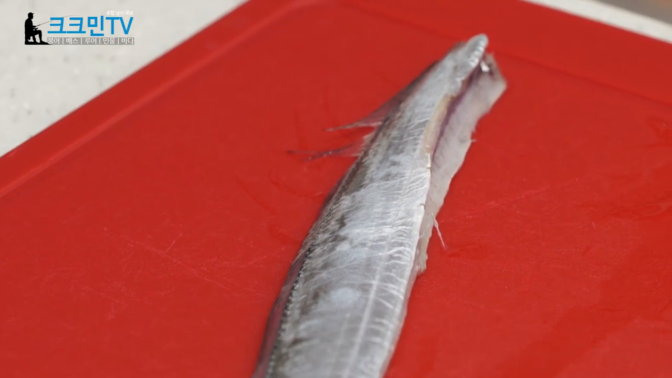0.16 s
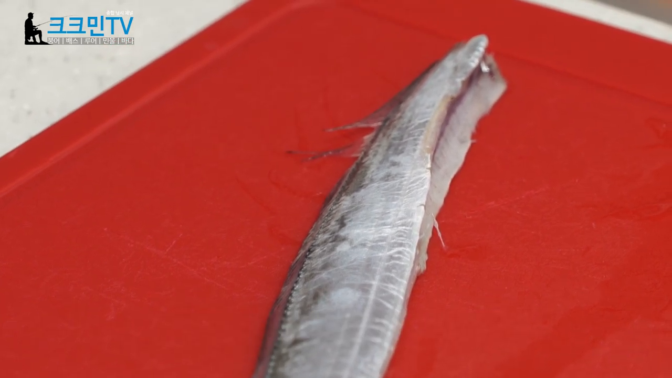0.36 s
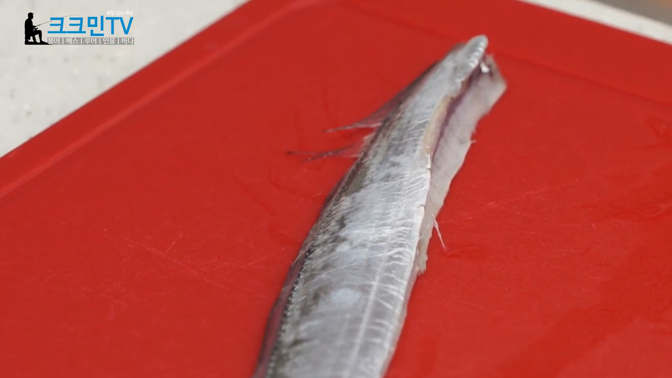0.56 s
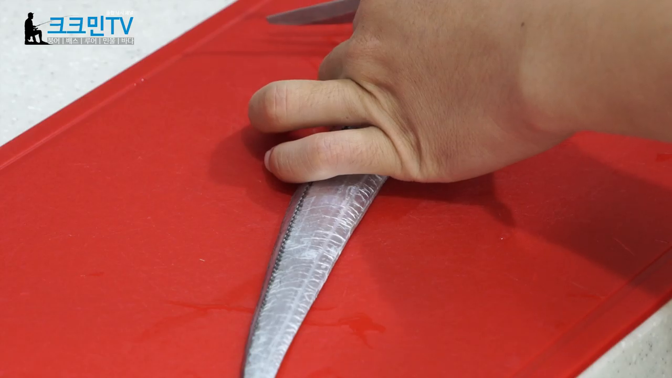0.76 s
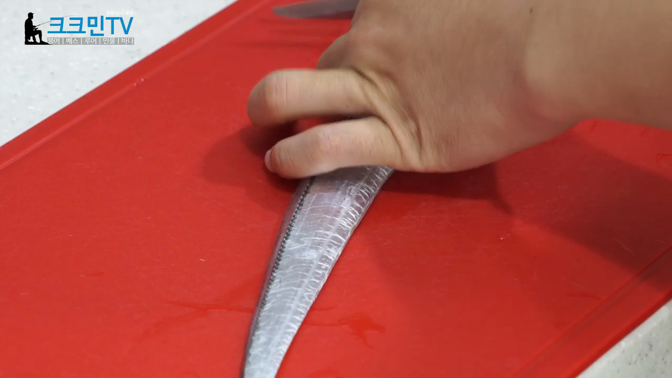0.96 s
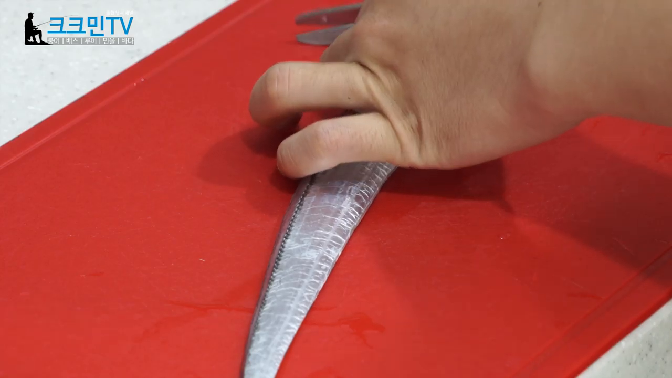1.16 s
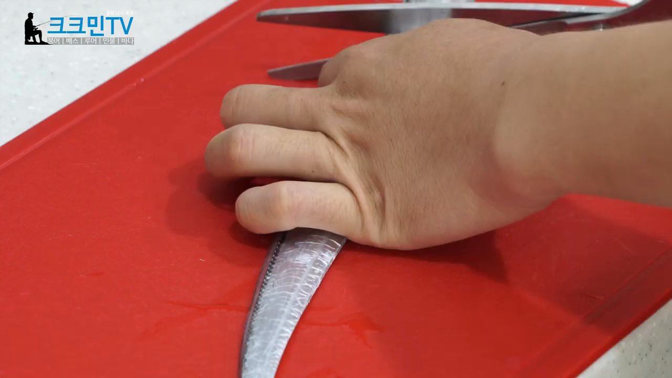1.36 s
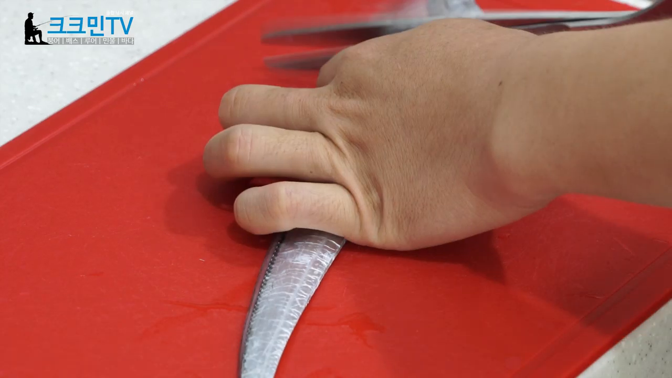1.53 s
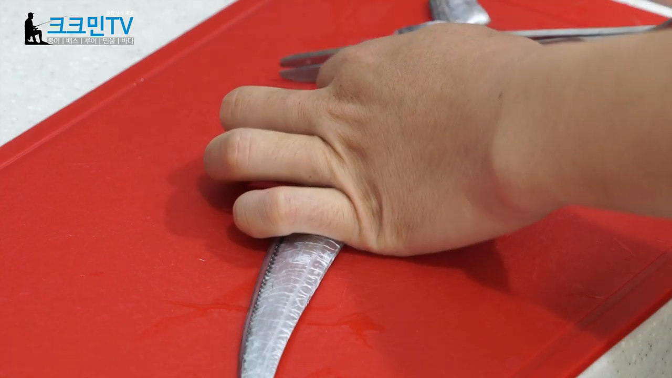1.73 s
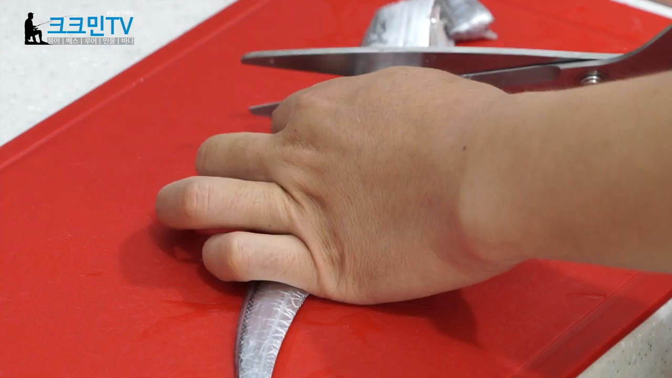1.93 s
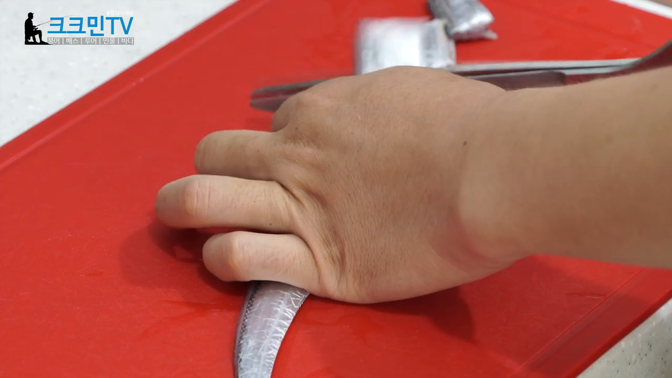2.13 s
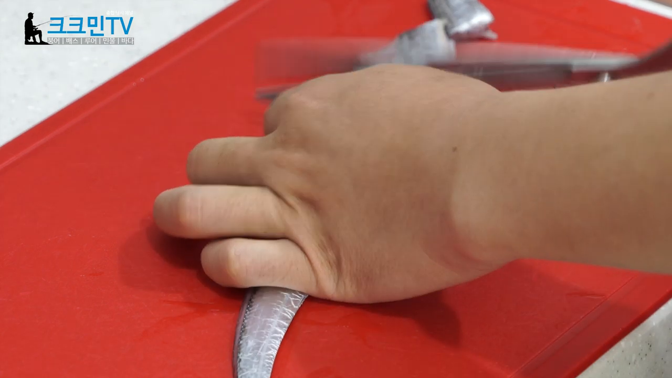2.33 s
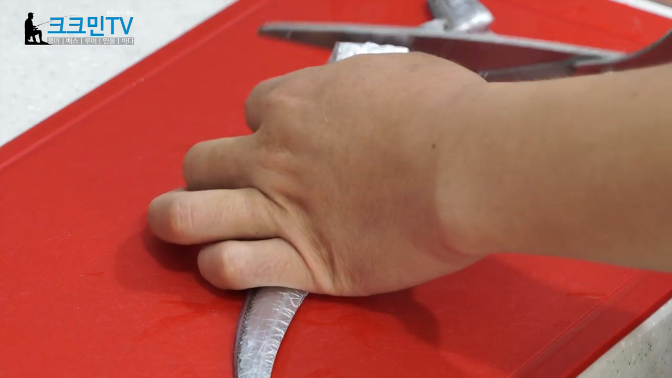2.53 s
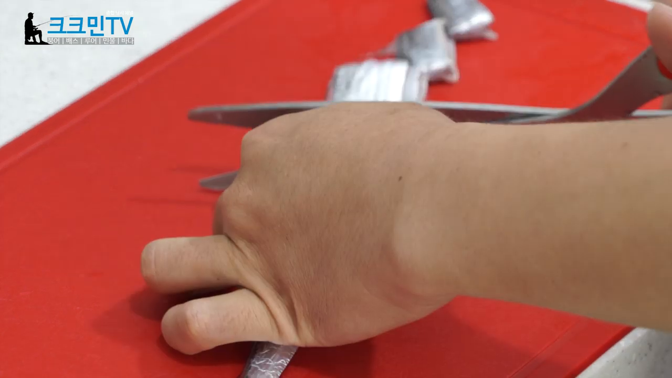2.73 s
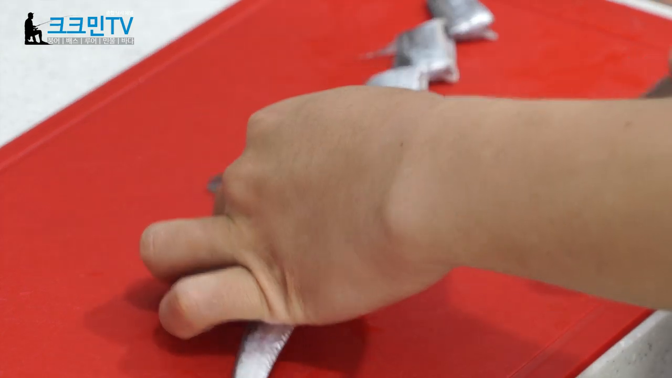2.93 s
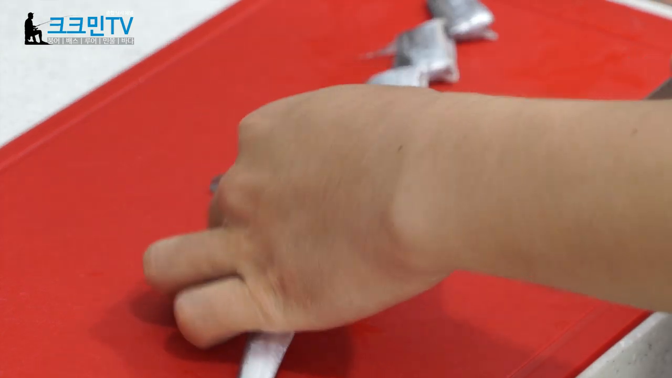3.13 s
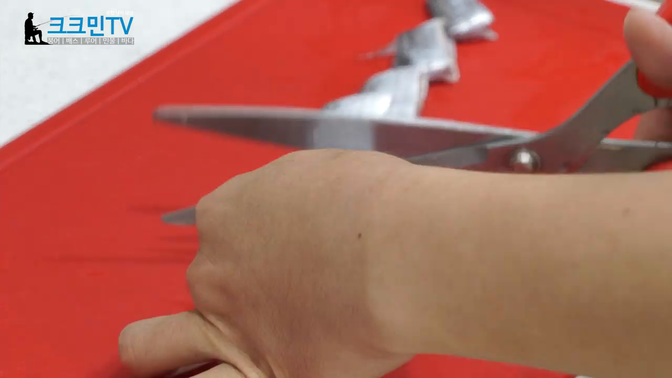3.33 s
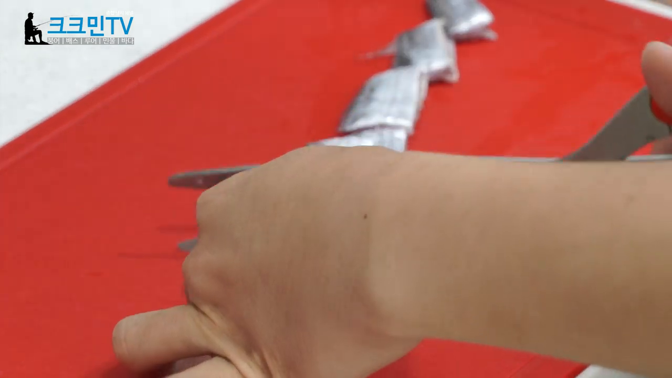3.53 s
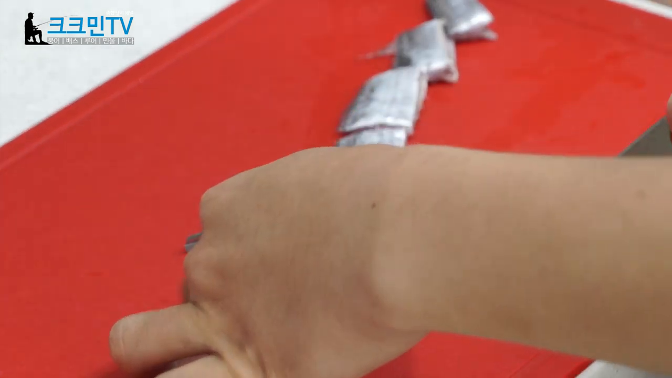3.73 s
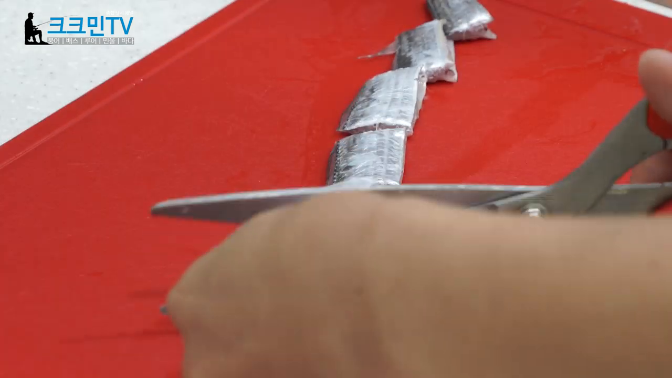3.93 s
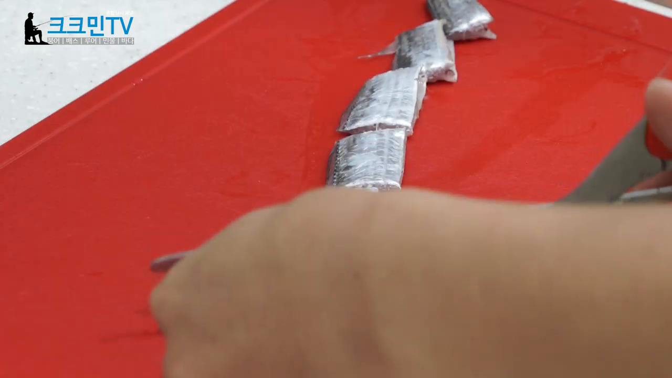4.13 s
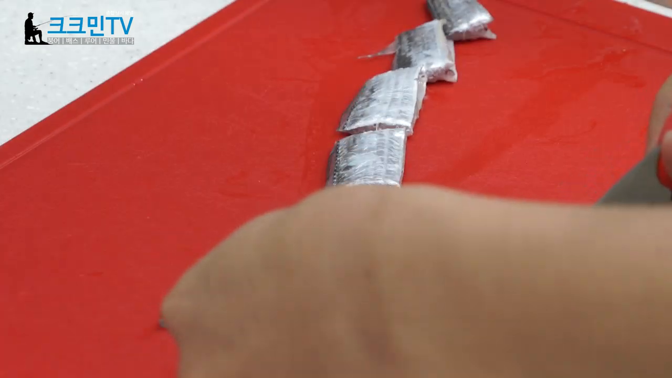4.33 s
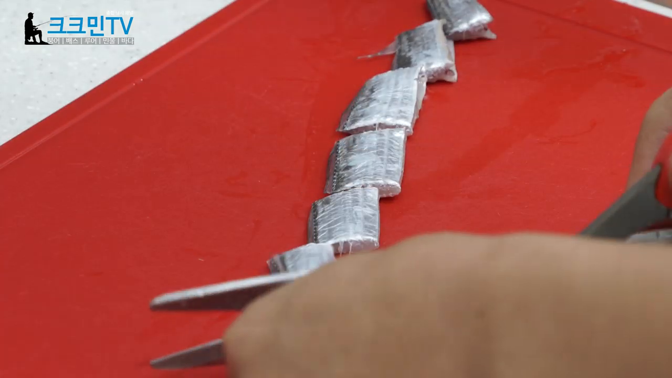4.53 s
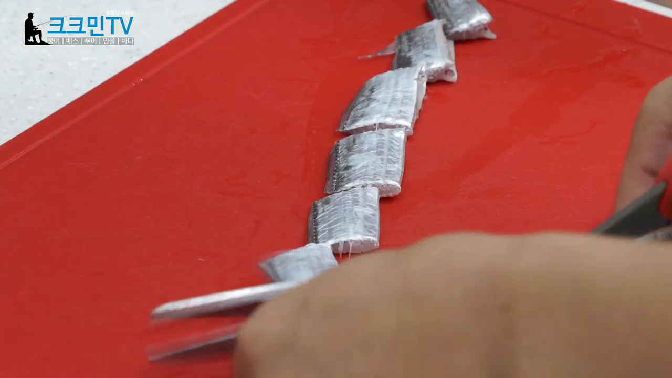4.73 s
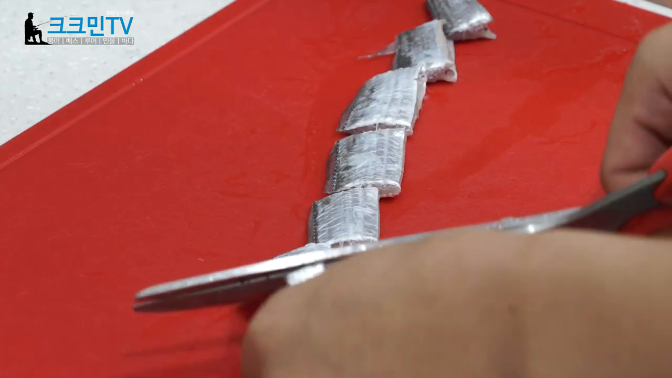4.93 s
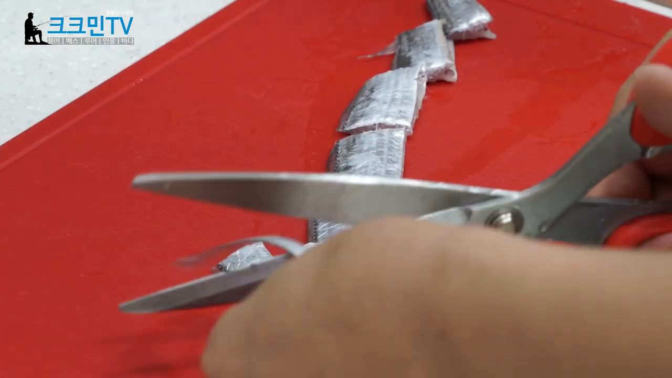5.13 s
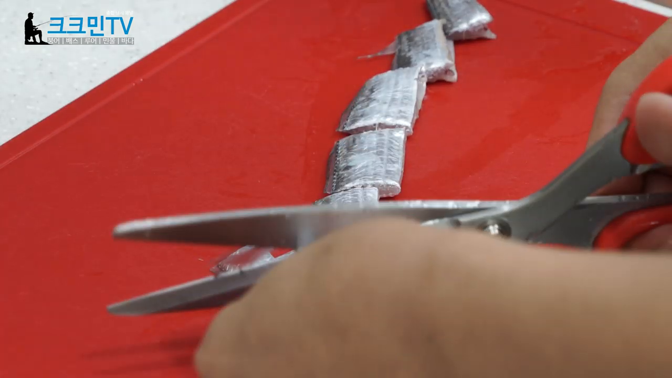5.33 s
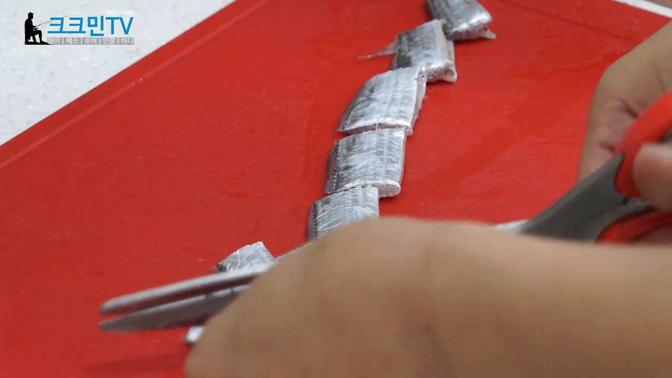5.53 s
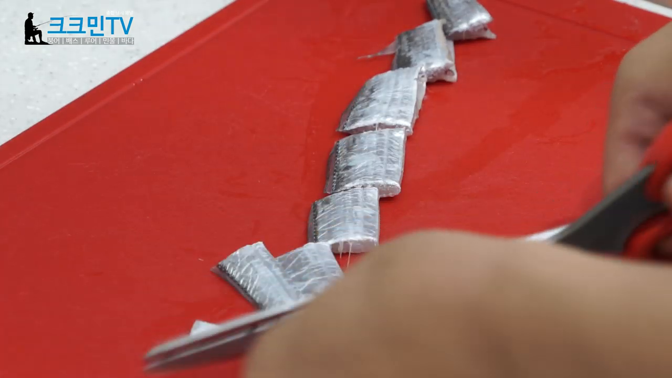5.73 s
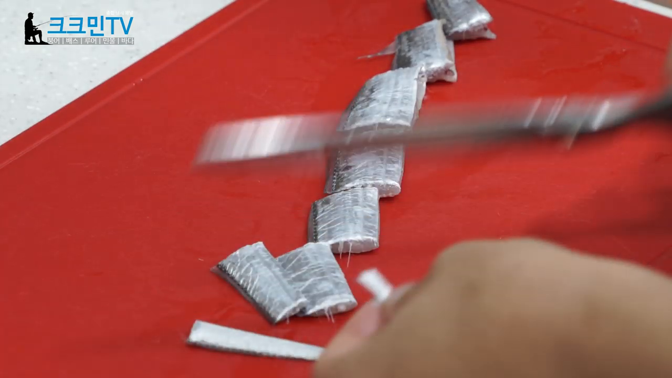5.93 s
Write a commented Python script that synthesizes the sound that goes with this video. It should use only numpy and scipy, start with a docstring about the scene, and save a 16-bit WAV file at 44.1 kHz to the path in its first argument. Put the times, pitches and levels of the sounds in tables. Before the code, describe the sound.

Kitchen scissors scrape and crunch through a small fish on a plastic board, handles clacking and board thudding, close up in a lightly echoing kitchen.

```python
"""Kitchen scissors cut a small fish on a plastic board, heard close by in mono.
The blades scrape and tick with a thin, mostly rising squeal: noise and clicks ringing steel resonances.
Clumped bursts of tiny fractures crunch through bone and skin; the handles clack shut as struck plastic.
Knocks on the board are filtered blows with a slow boom, and decaying sines ring the counter.
Around them, noise tails give the kitchen's reverberation, and a fan adds shaped noise and hum lines."""
import sys
import numpy as np
from scipy import signal
from scipy.fft import rfft, irfft, next_fast_len
from scipy.io import wavfile
from scipy.ndimage import uniform_filter1d

SR = 44100
rng = np.random.default_rng(int(sys.argv[2]) if len(sys.argv) > 2 else 0)


def generate_wav(sig):
    """Save sig (samples, or channels by samples) to the path in sys.argv[1] as 16-bit PCM at SR."""
    pcm = np.round(np.clip(np.atleast_2d(sig).T, -1, 1) * 32767).astype(np.int16)
    wavfile.write(sys.argv[1], SR, pcm)


N = 267687
TIME = np.arange(N) / SR

# The blades shear through bone and skin: start_s, length_s, level_db, blade_ring_hz, tilt_db_per_octave
BONE_CUTS = [(0.9566, 0.011, -19.5, 6250, 3.5), (.991, 0.0052, -18.5, 9000, 3),
             (1.271, 0.0055, -35, 5840, -1), (1.542, 0.01, -23, 8100, 4),
             (1.5605, 0.0062, -15.5, 8800, 1.5), (1.812, 0.017, -33.5, 8900, -1),
             (2.1396, .002, -17.5, 9900, 3), (2.153, 0.0069, -9.5, 10000, 1.5),
             (2.34, 0.032, -29, 11400, -1), (2.874, 0.019, -18, 7700, 1.5), (2.8829, .0033, -14, 8460, 0.5),
             (3.634, 0.0053, -10.5, 7740, 1.3), (4.1908, 0.017, -14.5, 8740, 1.5),
             (4.5, .015, -29, 9700, 1.5), (4.787, 0.0073, -16, 9500, 1.8), (5.111, 0.032, -36.5, 9600, -1),
             (5.391, 0.0097, -33, 6560, 2.5), (5.481, 0.012, -24.5, 7840, -1),
             (5.529, 0.0093, -32, 8500, -3.5)]
# Colour of the crunch: pitch_hz, level_db
CRUNCH_COLOUR = [(150, -30), (500, -3.5), (780, 10.5), (1100, 2), (1550, -2), (2200, 1.5), (3200, -0.5),
                 (4200, 4), (5400, -1.5), (7200, 1), (10000, 2.5), (12000, -1), (14300, -2.5), (16000, -6)]
CLUMP_DB = 3.2  # rms unevenness of the fractures
CUT_RING_DB = -12  # blade ring against the crunch

# Loudest catches of the edges and snaps of small bones: start_s, level_db, tilt_db_per_octave
EDGE_TICKS = [(.721, -27.5, 2.5), (.752, -19.5, -0.5), (.789, -17, -1), (.823, -17.5, -2),
              (0.9564, -14, -3), (0.9651, -10, -2.5), (0.9913, -23, -2), (1.356, -27.5, 1),
              (1.3985, -22, -1.5), (1.477, -22, -4), (1.505, -22.5, -5), (1.5382, -15, -3.5),
              (1.5588, -11.5, -1), (1.918, -26.5, -0.5), (2.093, -18.5, -1), (2.108, -20, 3),
              (2.130, -13, 1.5), (2.171, -13.5, -8), (2.657, -21, 4), (2.7393, -17.5, 1.5),
              (2.789, -27, -4), (3.4844, -26, 1), (3.525, -14, -1.5), (3.5566, -13, 5), (3.602, -26, 4),
              (4.0199, -16.5, 7.5), (4.109, -15, 4), (4.146, -10, 1), (4.1952, -5, 3), (4.6346, -28.5, 2),
              (4.7792, -24.5, 1), (4.7901, -16, 8)]
# Faint catches while the blades slide
CATCHES_PER_S, CATCH_DB, CATCH_SPREAD_DB, CATCH_TILT_DB_PER_OCTAVE = 18, -34, -1.5, 6

# The blades slide shut until they meet the fish:
# start_s, length_s, closing_s, first_squeal_hz, last_squeal_hz, squeal_db, scrape_db
BLADE_STROKES = [(0.81, 0.12, 0.23, 6000, 6040, -41, -46), (1.305, 0.48, 0.28, 6380, 7500, -52, -51),
                 (1.89, .24, .24, 7650, 8900, -57, -48), (2.65, 0.3, 0.2, 6040, 7860, -39, -40),
                 (3.472, 0.17, 0.081, 6230, 8100, -36, -34), (4.085, .07, .067, 6450, 8200, -33, -33),
                 (5.31, 0.22, 0.14, 6150, 7700, -56, -63), (5.66, .06, .06, 7460, 7200, -57, -70)]
# Resonances of the steel blades: pitch_hz, width_hz, level_db
BLADE_MODES = [(1347, 98, 12), (3650, 56, 19), (5020, 3600, 14.5), (6000, 3100, -5), (8800, 2800, 3.5),
               (10100, 830, 13.5), (13600, 930, 8)]
STROKE_ATTACK_S, STROKE_RELEASE_S = 0.0081, 0.01
CLOSING_CURVE = 1.62  # above 1, the blades gather speed as they close
STUTTER_DB = 6.5  # rms unevenness of the grip
SQUEAL_FADE_DB = -6  # change over one stroke length, as the fish damps the blades

# The handles clack shut: start_s, level_db, focus_hz
HANDLE_CLACKS = [(1.002, -28, 2230), (1.8331, -19.5, 2320), (2.156, -38, 820), (2.198, -23.5, 1970),
                 (2.349, -35, 2280), (2.9265, -23.5, 1840), (2.933, -17.5, 2070), (3.674, -18, 2200),
                 (3.686, -19, 1920), (4.237, -11, 2480), (4.514, -24, 2340), (4.802, -23.5, 3000),
                 (5.15, -22, 1960)]
# Resonances of the plastic handles: pitch_hz, width_hz, level_db
HANDLE_MODES = [(756, 126, 11.5), (2080, 93, 3), (2220, 100, 4), (2780, 350, -4)]

# The scissors come down on the board: start_s, thud_db, hardness_hz, boom_db, blade_tip_tap_db
BOARD_KNOCKS = [(1.113, -21.5, 586, -20.5, -21), (1.175, -25.5, 395, -22, -60),
                (1.228, -22.5, 296, -27, -60), (1.2858, -26.5, 990, -18.5, -31),
                (1.305, -25, 483, -22.5, -49), (1.567, -19.5, 670, -23, -43),
                (1.767, -16.5, 465, -12, -27.5), (1.831, -22, 497, -18, -39), (2.821, -16, 275, -19.5, -45),
                (2.927, -12.5, 600, -18, -27), (2.982, -8.5, 260, -12, -46),
                (3.4993, -11.5, 352, -14.5, -25.5), (3.556, -15.5, 352, -20, -37),
                (3.68, 0, 520, -10, -15.5), (4.02, -20.5, 510, -30, -61), (4.1543, -16.5, 620, -14.5, -28),
                (4.2446, -3, 520, -11, -19.5), (4.525, -17, 502, -23, -37), (4.691, -17.5, 84, -23, -51),
                (5.608, -34, 1100, -55, -29)]
BOARD_HZ, TAP_HZ, TAP_WIDTH_HZ = 216, 1236, 340
# Boom of the board, struck at either end: pitch_hz, far_end_db, near_end_db, t60_s
BOARD_BOOM = [(79.5, -7, 2, 0.24), (122.2, 1, -5.5, 0.27), (198.2, -2, -17, 0.16)]
FAR_S, NEAR_S = 2.55, 3.57  # between these times the scissors work from the far end to the near end
# Ringing of the counter under the board: pitch_hz, level_db, t60_s
COUNTER_MODES = [(194, -17, .2), (262.5, 2, .4), (326, -5.5, .36), (441, -16, .3), (506, -8, .24),
                 (549, -18, .25), (745, -19, .25)]
COUNTER_DB, COUNTER_GROWTH = -4, 1.53  # ring level under a 0 dB thud, and its gain in dB per thud dB

# Reverberation of the kitchen: pitch_hz, t60_s
ROOM_DECAY = [(100, 0.58), (500, 0.81), (1400, 1), (2200, 0.56), (3500, 0.58), (9500, 0.49), (15000, 0.19)]
ROOM_TURNS_PER_S = 1.3

# Spectrum of the room air: pitch_hz, level_db_per_hz
AIR_SPECTRUM = [(12, -63), (20, -12), (38, 1), (95, -3), (126, -0.5), (197, -8.5), (276, -3.5),
                (365, -11.5), (431, -10), (620, -18), (754, -18), (1080, -24.5), (1250, -25), (1430, -27.5),
                (15800, -39)]
# Hum lines of a fan: pitch_hz, level_db
FAN_HUM = [(84, -53), (123.5, -48), (278.5, -49.5), (333.8, -54), (441, -55.5), (748.4, -55.5)]
HISS_DB, HISS_RISE_DB, HISS_RISE_S = 2.5, 3.5, (0.48, 1.2)  # the hiss comes up a little as the work begins

EDGE_HZ = 16000  # upper band limit
CEILING = 0.57  # full scale is 1


def cuts(release=0.013, attack=0.0012, ring_width=750, ripple_db=2.5):
    """A dense, clumped run of tiny fractures, which rings the blades where they cross."""
    out, t = np.zeros(N), np.arange(SR // 8) / SR
    grid = np.linspace(0, SR / 2, 64)
    for start, length, db, ring_hz, tilt_db in BONE_CUTS:
        clumps = amp(CLUMP_DB * unit(uniform_filter1d(rng.standard_normal(len(t)), size=60)))
        push = (1 - np.exp(-t / attack)) * np.exp(-np.maximum(t - length, 0) / release)
        fractures = slips(len(t), per_s=4100, spread_db=3.5, fizz=0.54) * clumps * push
        ripple = ripple_db * rng.standard_normal(len(grid))  # each crossing point favours other modes

        def crunch_gain(hz):
            return amp(read(CRUNCH_COLOUR, hz) + np.interp(hz, grid, ripple)) * tilted(hz, tilt_db)

        crunch = unit(colour(fractures, crunch_gain))
        broad_ring = resonate(fractures, ring_hz, 3 * ring_width)
        ring = unit(resonate(broad_ring, ring_hz, ring_width))
        add(out, start, burst(crunch + amp(CUT_RING_DB) * ring, db, length + release / 2))
    return out


def ticks():
    """Loud catches of the edges, and faint ones at uneven intervals for up to a third of a second a stroke."""
    out = np.zeros(N)
    for start, db, tilt_db in EDGE_TICKS:
        add(out, start, tick(db, tilt_db))
    for start, length, *_ in BLADE_STROKES:
        jitters, sizes = rng.random(size=6), rng.standard_normal(size=6)
        for k, (jitter, size) in enumerate(zip(jitters, sizes)):
            delay = (k + jitter) / CATCHES_PER_S
            sound = tick(CATCH_DB + CATCH_SPREAD_DB * size, CATCH_TILT_DB_PER_OCTAVE)
            if delay < length:
                add(out, start + delay, sound)
    return out


def tick(db, tilt_db, decay=0.001, ring_db=-22, ring_decay=0.015):
    """One sharp catch of the edges, heard through the steel."""
    t = np.arange(SR // 16) / SR
    envelope = np.exp(-t / decay) + amp(ring_db) * np.exp(-t / ring_decay)
    drive = rng.standard_normal(len(t)) * envelope
    return burst(colour(drive, lambda hz: steel(hz) * tilted(hz, tilt_db)), db, 0.00065)


def scrape(squeal_width=200, shimmer_hz=10400, shimmer_width=1100, shimmer_db=-3):
    """Edge sticks and slips on edge: grit, a high shimmer, and a squeal that glides as the blades close."""
    out, t = np.zeros(N), np.arange(SR // 3) / SR  # a stroke sounds for at most a third of a second
    for start, length, closing, first_hz, last_hz, squeal_db, scrape_db in BLADE_STROKES:
        squeal_hz = first_hz + (last_hz - first_hz) * np.minimum(t / closing, 1) ** CLOSING_CURVE
        release = np.exp(-np.maximum(t - length, 0) / STROKE_RELEASE_S)
        push = np.minimum(t / STROKE_ATTACK_S, 1) * release
        grip = unit(amp(STUTTER_DB * unit(uniform_filter1d(rng.standard_normal(len(t)), size=260))))
        stick_slip = slips(len(t), per_s=630, spread_db=10.5, fizz=1.0)
        broad_squeal = resonate(rng.standard_normal(len(t)), squeal_hz, squeal_width)
        squeal = unit(resonate(broad_squeal, squeal_hz, squeal_width))
        shimmer = unit(colour(stick_slip, lambda hz: peak(hz, shimmer_hz, shimmer_width) ** 2))
        grit = unit(unit(colour(stick_slip, steel)) + amp(shimmer_db) * shimmer)
        fading_squeal = amp(squeal_db + SQUEAL_FADE_DB * t / length) * squeal
        add(out, start, push * grip * (fading_squeal + amp(scrape_db) * grit))
    return out


def clacks(focus_width=900, tap_delay=0.00107):
    """The plastic handles meet; the blade tip taps the board at each knock."""
    out = np.zeros(N)
    for start, db, focus_hz in HANDLE_CLACKS:
        add(out, start, clack(db, lambda hz: body(hz, HANDLE_MODES) * peak(hz, focus_hz, focus_width)))
    for start, *_, tap_db in BOARD_KNOCKS:
        tap = clack(tap_db, lambda hz: peak(hz, TAP_HZ, TAP_WIDTH_HZ) * peak(hz, TAP_HZ, TAP_HZ))
        add(out, start + tap_delay, tap)
    return out


def clack(db, gain, decay=0.0047, chatter=0.28, top_hz=3200, bounce=0.13, bounce_s=0.00279):
    """A hard blow, a quick bounce and a little chatter ring stiff plastic of the colour gain(hz)."""
    t = np.arange(SR // 12) / SR
    drive = chatter * rng.standard_normal(len(t)) * np.exp(-t / decay)
    add(drive, 0, [2])
    add(drive, bounce_s * (0.5 + rng.random()), [2 * bounce])  # bounce_s is the mean delay
    return burst(colour(drive, lambda hz: gain(hz) / np.hypot(1, (hz / top_hz) ** 2)), db, 0.0041)


def knocks(rattle=0.046, rattle_decay=0.025, boom_rise=0.019, low_hz=150,
           board_width=120, board_db=4, ring_rise=0.03):
    """A dull thud of the board; its slow boom follows, and hard blows set the counter ringing."""
    out, t = np.zeros(N), np.arange(SR * 3 // 5) / SR
    for start, db, hard_hz, boom_db, _ in BOARD_KNOCKS:
        drive = rattle * rng.standard_normal(len(t)) * np.exp(-t / rattle_decay)
        drive[0] -= 1  # the blow itself
        blow = colour(drive, lambda hz: hz / np.hypot(hz, low_hz) / np.sqrt(1 + (hz / hard_hz) ** 5.62))
        thud = blow + amp(board_db) * resonate(blow, BOARD_HZ, board_width)
        boom = 0
        for hz, far_db, near_db, t60 in BOARD_BOOM:
            place_db = np.interp(start, [FAR_S, NEAR_S], [far_db, near_db])
            boom = boom + decaying_sine(t, hz, boom_db + place_db, t60)
        ring_db = COUNTER_DB + COUNTER_GROWTH * db
        ring = sum(decaying_sine(t, hz, ring_db + mode_db, t60) for hz, mode_db, t60 in COUNTER_MODES)
        slow_boom = boom * (1 - np.exp(-t / boom_rise))
        slow_ring = ring * (1 - np.exp(-t / ring_rise))
        add(out, start, burst(thud, db, 0.0044) - slow_boom - slow_ring)
    return out


def kitchen(x, delay=0.002, near=1.0, near_decay=0.032):
    """Strong early reflections, then each band dies at its own speed; three tails blend in turn."""
    out = np.zeros(N)
    for k in range(3):  # differing tails keep the colour of the reverberation varied and even
        hz, t, z = signal.stft(rng.standard_normal(SR // 2), SR, nperseg=256)
        decay = amp(-60 * t / read(ROOM_DECAY, hz)[:, None])
        tail = signal.istft(z * decay, SR, nperseg=256)[1]
        t = np.arange(len(tail)) / SR
        early = (1 - np.exp(-(t / delay) ** 2)) * (1 + near * np.exp(-t / near_decay))
        spectrum = rfft(tail * early)
        power = abs(spectrum) ** 2  # a diffuse room favours no single band
        evening = np.sqrt(uniform_filter1d(power, size=1500) / uniform_filter1d(power, size=40))
        tail = irfft(spectrum * evening)[:SR * 2 // 5]
        share = np.sqrt(2 / 3) * np.cos(2 * np.pi * (ROOM_TURNS_PER_S * TIME + k / 3))
        out += signal.fftconvolve(x * share, tail / np.linalg.norm(tail))[:N]
    return out


def air(air_db=-39.0, waver=0.34, low_hz=32):
    """Steady rush of a fan as shaped noise, with wavering hum lines and a faint hiss."""
    size = next_fast_len(N)
    hz = np.fft.rfftfreq(size, 1 / SR)
    shape = amp(read(AIR_SPECTRUM, hz)) / np.hypot(1, (low_hz / (hz + 1)) ** 4)
    rush = unit(irfft(rfft(rng.standard_normal(size)) * shape, size)[:N])
    hiss = signal.sosfilt(signal.butter(1, 500, "high", fs=SR, output="sos"), rush)
    hiss_gain = amp(HISS_DB + np.interp(TIME, HISS_RISE_S, [0, HISS_RISE_DB]))
    out = amp(air_db) * (rush + hiss * (hiss_gain - 1))  # the rush already holds the hiss once
    knots = np.linspace(0, N / SR, 40)
    for pitch, db in FAN_HUM:
        swell, drift = (waver * np.interp(TIME, knots, row) for row in rng.standard_normal((2, len(knots))))
        out += amp(db) * np.sqrt(2) * (1 + swell) * np.sin(2 * np.pi * pitch * TIME + 2 * drift)
    return out


def amp(db):
    """Decibels to gain."""
    return 10 ** (np.asarray(db) / 20)


def unit(x):
    """Scales to an rms of 1."""
    return x / np.sqrt(np.mean(x ** 2) + 1e-20)


def read(points, hz):
    """Joins (Hz, value) points on a log-frequency axis."""
    f, value = np.transpose(points)
    return np.interp(np.log(hz + 1), np.log(f + 1), value)


def add(mix, start, sound):
    """Mixes a sound in at start seconds."""
    part = mix[max(round(start * SR), 0):][:len(sound)]
    part += sound[:len(part)]


def burst(x, db, seconds):
    """Gives a short sound the energy of the level db held for that many seconds."""
    return x * amp(db) * np.sqrt(seconds * SR / (np.sum(x ** 2) + 1e-20))


def colour(x, gain, size=4096):
    """Causal minimum-phase filter with the magnitude gain(hz)."""
    log_gain = np.log(np.maximum(gain(abs(np.fft.fftfreq(size, 1 / SR)) + 1), 1e-5))
    taps = np.fft.ifft(np.exp(np.conj(signal.hilbert(log_gain)))).real
    return signal.fftconvolve(x, taps[:size // 2])[:len(x)]


def peak(hz, centre, width):
    """Magnitude of one resonance."""
    return 1 / np.sqrt(1 + ((hz ** 2 - centre ** 2) / (hz * width)) ** 2)


def body(hz, modes):
    """Magnitude of all resonances of one object together."""
    return np.sqrt(sum((amp(db) * peak(hz, f, w)) ** 2 for f, w, db in modes))


def steel(hz):
    """Magnitude of the blade resonances."""
    return body(hz, BLADE_MODES)


def tilted(hz, tilt_db):
    """A slope in dB per octave above 500 Hz."""
    return amp(tilt_db * np.log2(np.maximum(hz, 500)))


def resonate(x, hz, width):
    """A resonance that follows the curve hz: shift down to 0 Hz, smooth, shift back."""
    turn = np.exp(2j * np.pi * np.cumsum(hz * np.ones(len(x))) / SR)
    r = np.exp(-np.pi * width / SR)
    return 2 * (turn * signal.lfilter([1 - r], [1, -r], x / turn)).real


def decaying_sine(t, hz, db, t60):
    """One mode that falls 60 dB in t60 seconds."""
    return amp(db - 60 * t / t60) * np.sin(2 * np.pi * hz * t)


def slips(count, per_s, spread_db, fizz):
    """Random clicks of uneven size over a fine fizz."""
    size = amp(spread_db * np.minimum(rng.exponential(1, count), 3)) * rng.choice([-1, 1], count)
    clicks = unit(size * (rng.random(count) < per_s / SR))
    return clicks + fizz * rng.standard_normal(count)


def scene(blade_room_db=-8.5, clack_room_db=-11, board_room_db=-13):
    """Scissors and board close by, the kitchen around them."""
    blades = cuts() + ticks() + scrape()
    handles = clacks()
    board = knocks()
    to_room = amp(blade_room_db) * blades + amp(clack_room_db) * handles + amp(board_room_db) * board
    room = kitchen(to_room)
    return (blades + handles + board + room + air())[None]


def record(dry):
    """The loudest peaks are rounded off; then the band limit."""
    rounded = dry / (1 + (dry / CEILING) ** 4) ** 0.25
    low_pass = signal.firwin(401, EDGE_HZ, window=("kaiser", 9), fs=SR)
    return signal.oaconvolve(rounded, low_pass[None], "same")


dry = scene()
out = record(dry)
generate_wav(out)
```